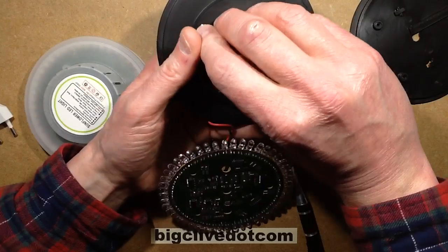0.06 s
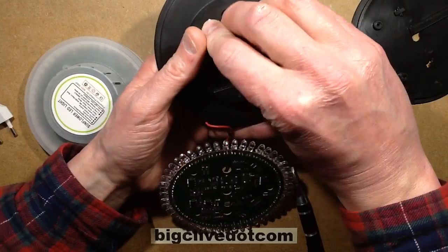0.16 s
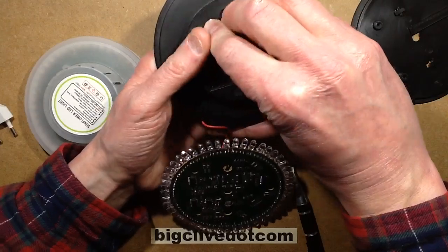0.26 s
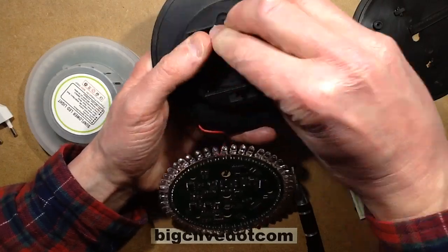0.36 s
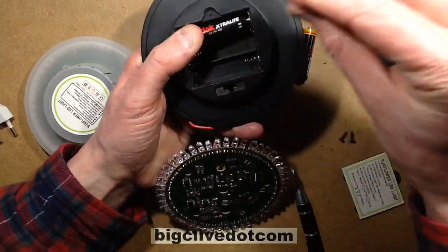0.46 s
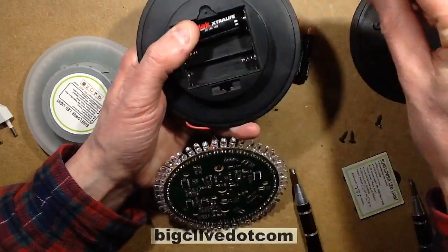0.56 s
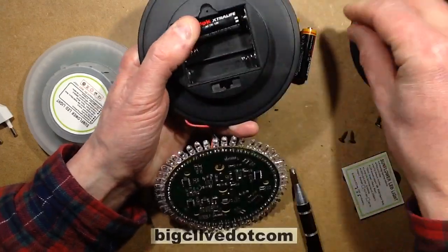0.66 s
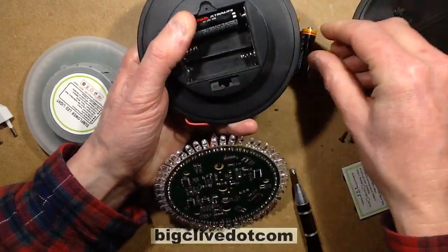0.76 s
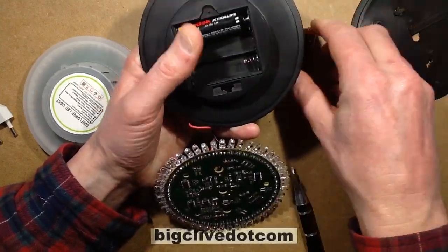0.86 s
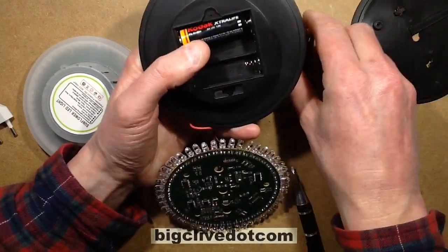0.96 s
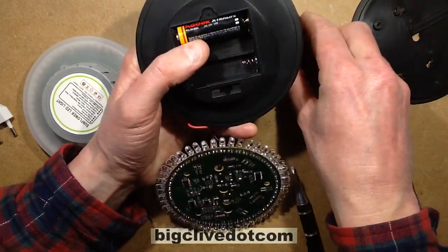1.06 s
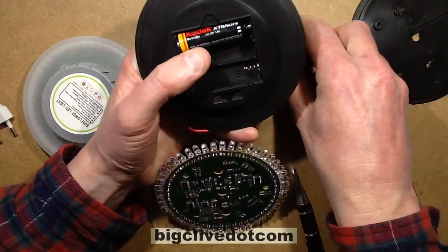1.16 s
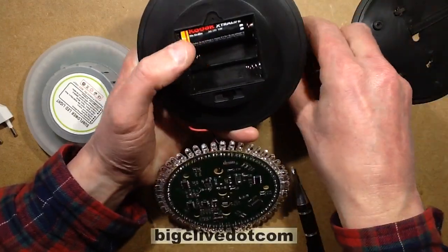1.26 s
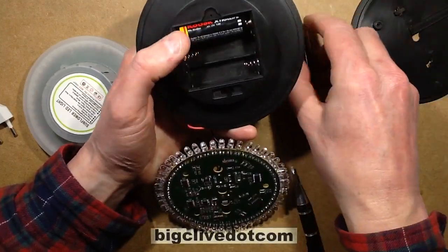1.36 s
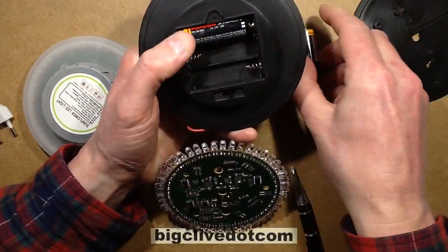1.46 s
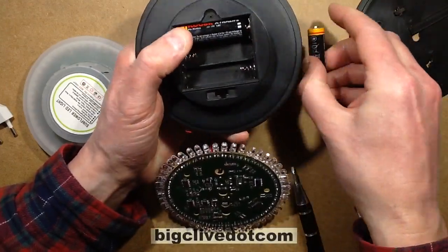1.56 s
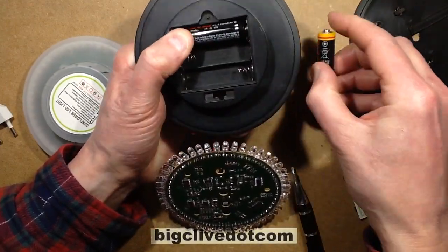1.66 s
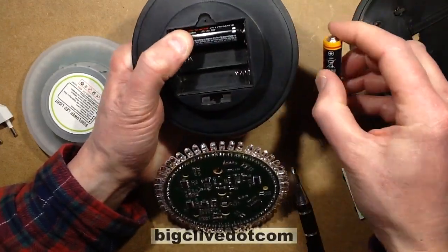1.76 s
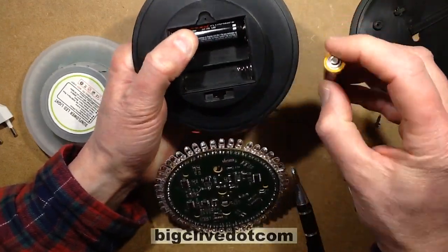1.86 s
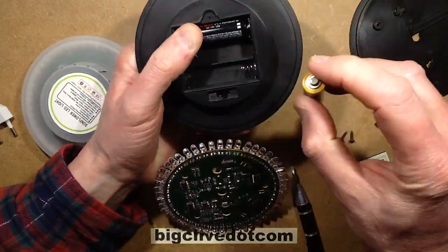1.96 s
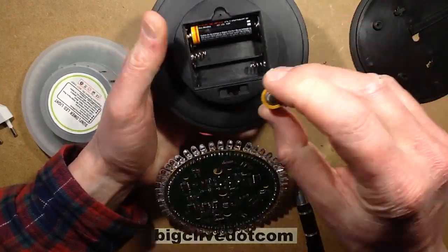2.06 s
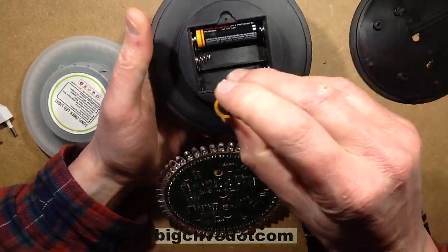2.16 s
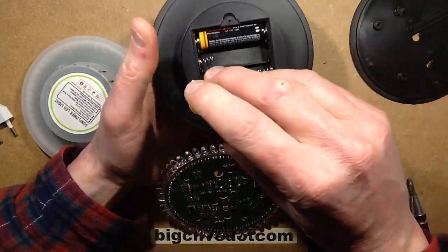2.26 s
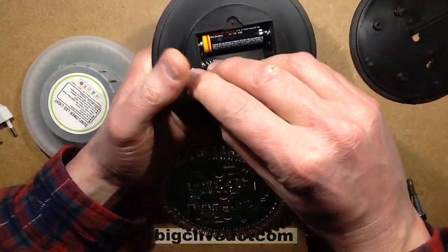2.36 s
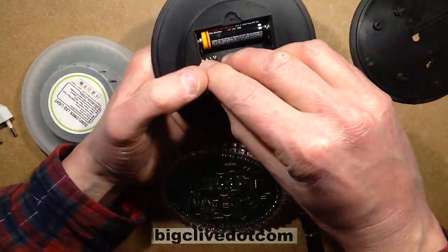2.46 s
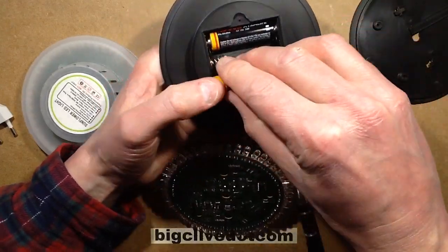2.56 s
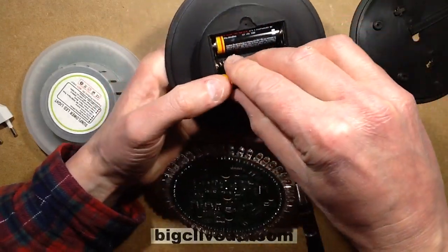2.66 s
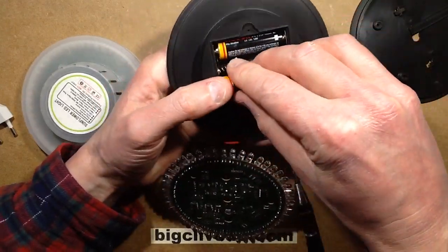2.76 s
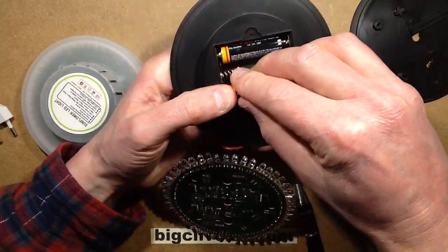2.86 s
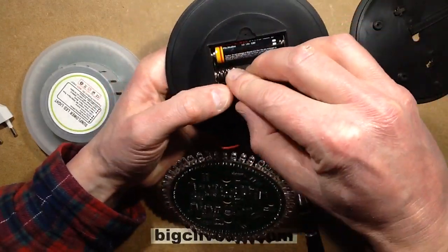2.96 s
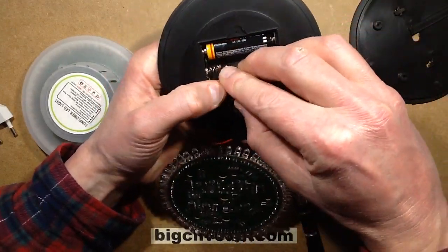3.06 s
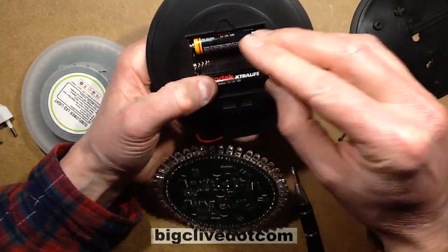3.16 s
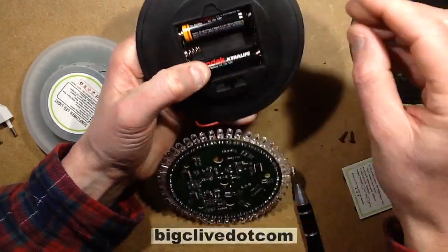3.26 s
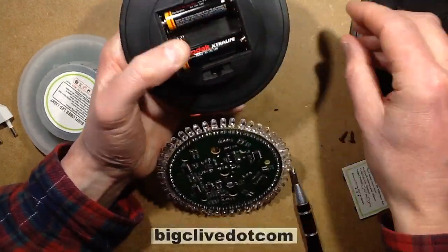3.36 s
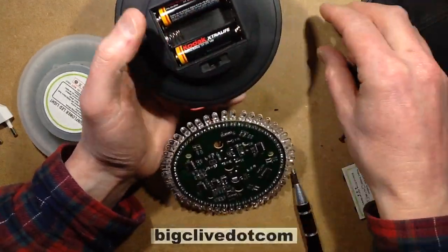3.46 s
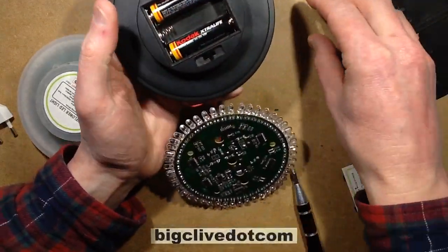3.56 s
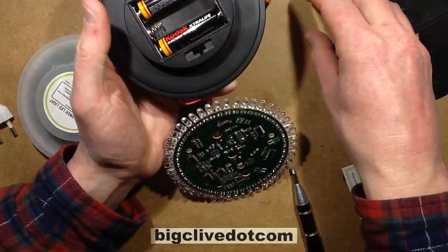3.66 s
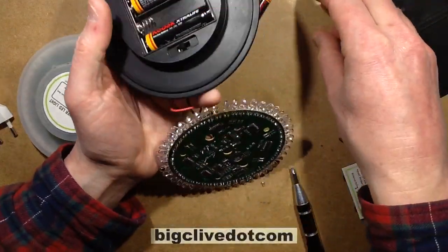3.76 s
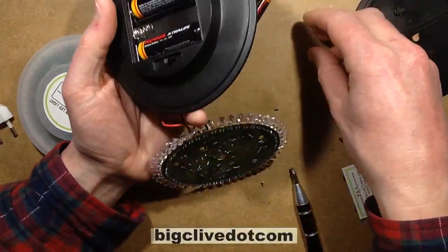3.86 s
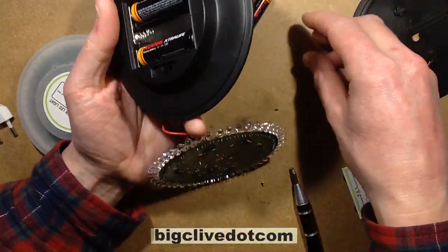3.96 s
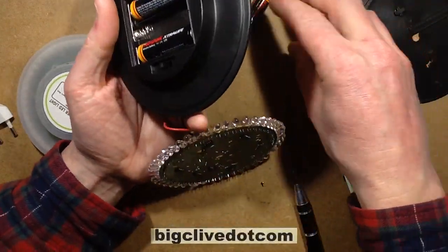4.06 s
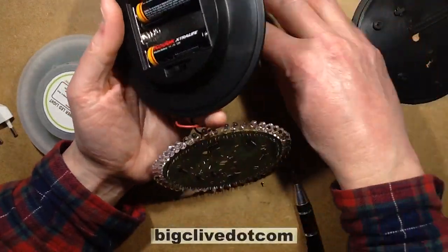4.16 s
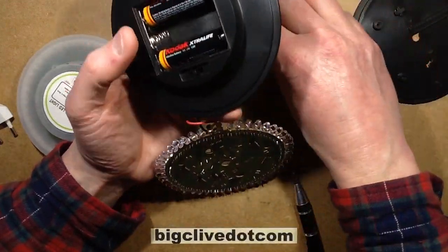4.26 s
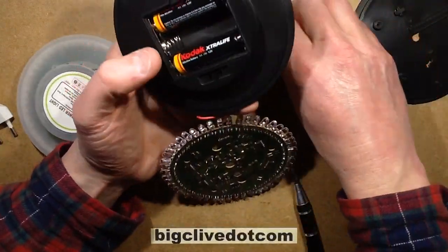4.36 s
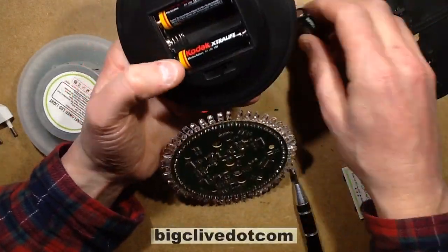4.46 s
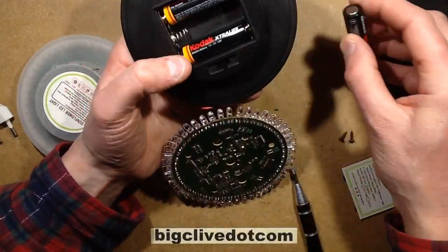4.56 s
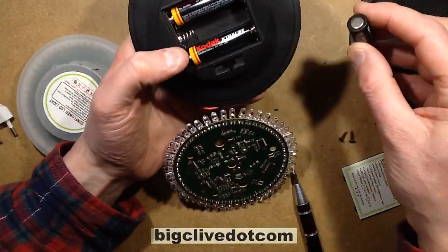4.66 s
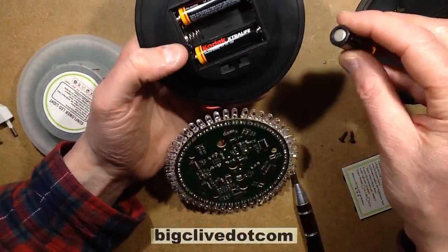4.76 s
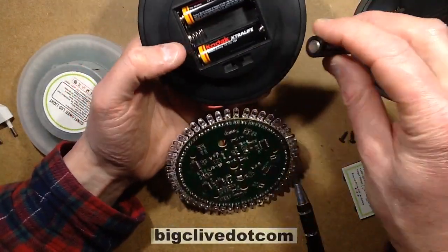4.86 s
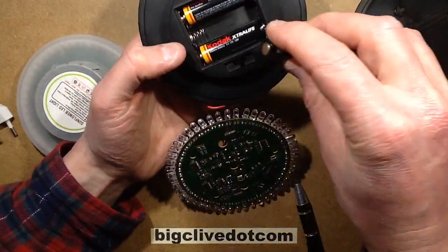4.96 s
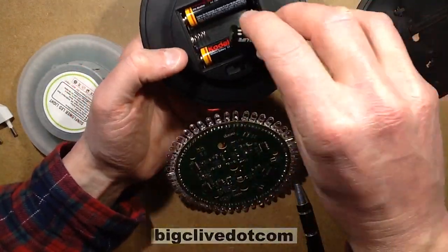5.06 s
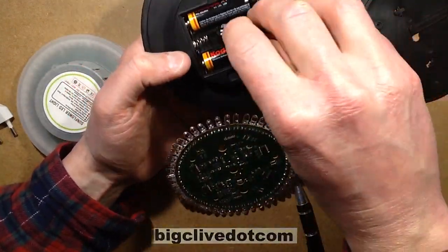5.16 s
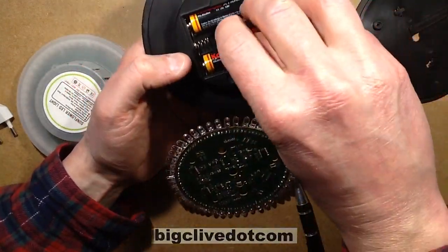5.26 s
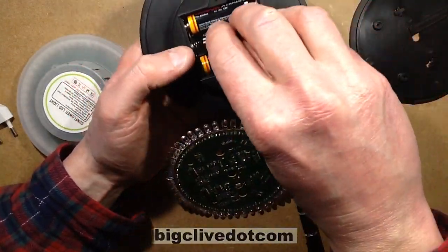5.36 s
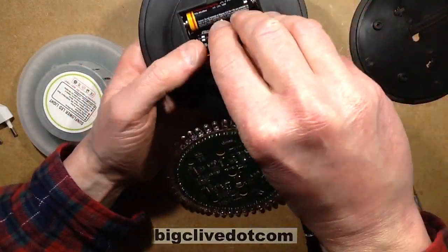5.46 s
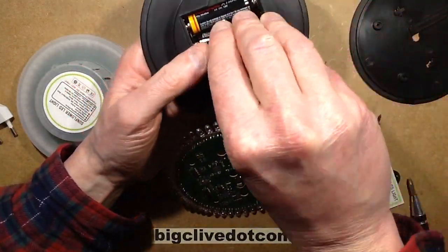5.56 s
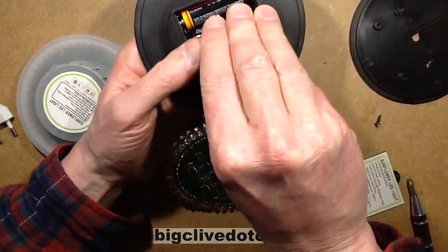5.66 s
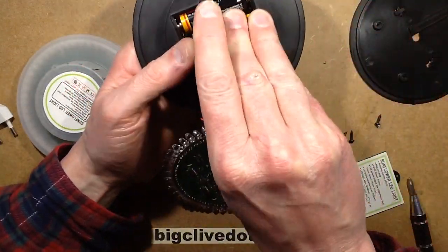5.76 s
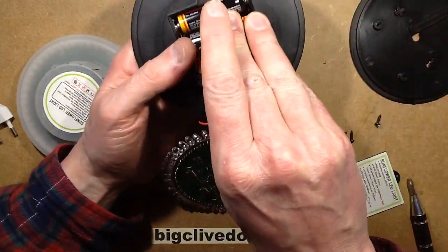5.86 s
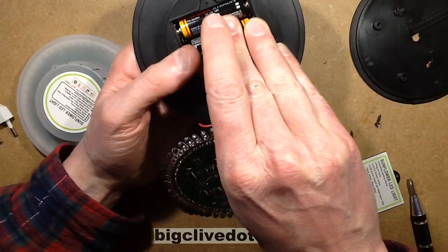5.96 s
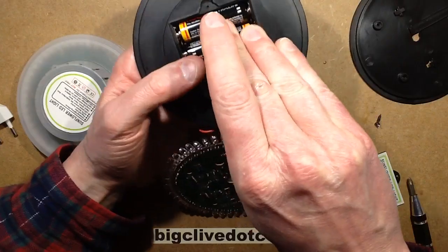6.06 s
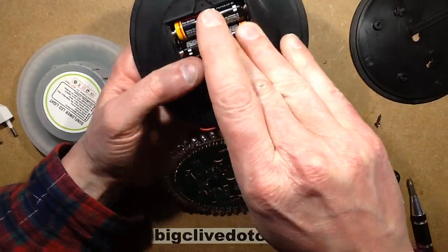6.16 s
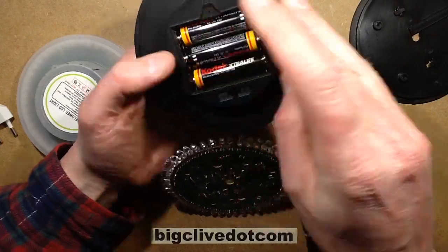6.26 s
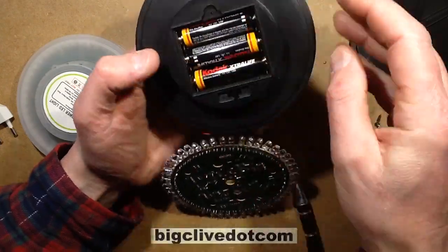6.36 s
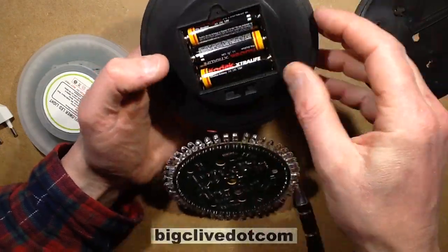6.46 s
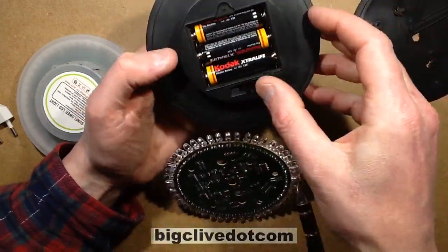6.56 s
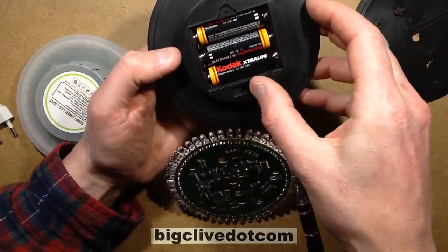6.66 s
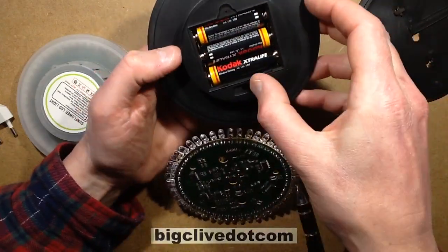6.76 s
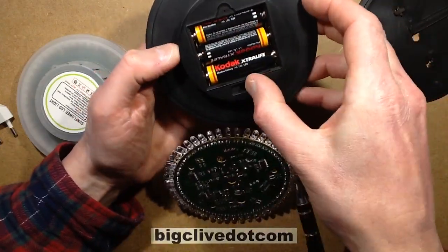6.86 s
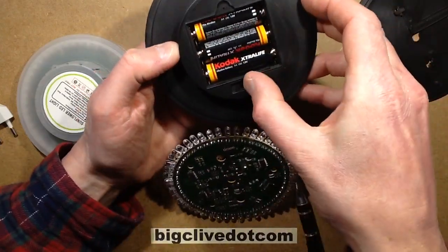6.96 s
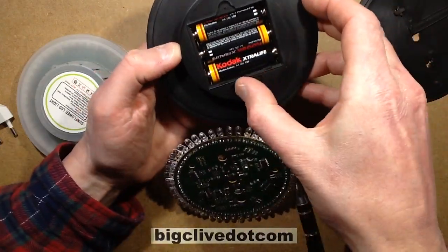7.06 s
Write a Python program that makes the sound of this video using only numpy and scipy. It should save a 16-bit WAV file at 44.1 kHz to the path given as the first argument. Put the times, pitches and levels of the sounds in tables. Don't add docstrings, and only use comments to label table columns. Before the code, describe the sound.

Small batteries snap into a hollow plastic holder with irregular clicks, metal spring pings, finger rubs and soft bench bumps, close up in a small room.

```python
import sys
import numpy as np
from scipy import signal
from scipy.fft import rfft, irfft, next_fast_len
from scipy.io import wavfile
from scipy.ndimage import map_coordinates

SR = 44100
rng = np.random.default_rng(int(sys.argv[2]) if len(sys.argv) > 2 else 0)


def bounce(signal):
    frames = np.transpose(np.atleast_2d(signal))
    limited = np.clip(frames, -1, 1)
    pcm = np.round(limited * 32767).astype(np.int16)
    wavfile.write(sys.argv[1], SR, pcm)


def gain_from_decibels(decibels):
    exponent = np.asarray(decibels, float) / 20
    return 10 ** exponent


N = 313196

# pitch in Hz, width in Hz, level in dB.
BAY_MODES = [(665, 100, 0), (940, 150, -4), (1150, 120, -2)]
# pitch in Hz, width in Hz, level in dB.
SHELL_MODES = [(1430, 230, -9.5), (2053, 210, 1), (2470, 1400, -8.5), (3000, 1100, -6)]
# pitch in Hz, width in Hz, level in dB.
RIM_MODES = [(4060, 570, 0.5), (4900, 1400, -3.5), (5800, 200, -3.5), (6310, 310, -2), (8300, 4700, -7),
             (11080, 2600, -6), (13800, 2700, -12.5)]
# pitch in Hz, width in Hz, level in dB.
BENCH_MODES = [(120, 50, -13), (177, 20, 0), (250, 30, -7), (320, 60, -12), (450, 60, -12)]
# start in seconds, peak in dB, shell ring in Hz,
# bay knock in dB, rim snap in dB (both against the shell ring).
SNAPS = [(0.2202, -24, 1203, -3, -5.5), (0.2375, -20.5, 2230, -17, -38), (1.063, -16, 3620, -29, -9),
         (1.3805, -17, 2050, -10.5, -17), (1.6466, -15, 1900, -4, -10), (2.3329, -11.5, 2440, -9.5, -16.5),
         (2.359, -15, 2044, -6.5, -11.5), (2.7157, -5, 2155, -14.5, -23), (2.7582, -25.5, 2599, -4.5, -9),
         (2.7646, -29, 2580, 2, -12), (2.789, -9, 2120, -13, -21), (2.9012, -25, 2120, -7, -22.5),
         (3.045, -26, 2895, -7, 9), (3.0476, -3, 2580, -11.5, -6.5), (4.209, -25.5, 1580, -3, -39),
         (5.1824, -22.5, 2300, -16, -11), (5.188, -14, 3020, -17, -22.5), (5.445, -31, 2060, -12.5, -8.5),
         (5.697, -18.5, 2600, -7.5, 4.5), (5.7, -15, 2240, -6, -1.5), (5.7163, -23.5, 2542, -39, 2.5),
         (5.968, -13.5, 2700, -15, -4.5), (5.9708, -20.5, 3440, 1.5, 3), (5.9707, -6, 2470, -29, -6.5)]
# start in seconds, peak in dB, bay knock in dB, rim snap in dB.
TAPS = [(.0014, -34, 2, -7), (.0852, -35, 7, -6.5), (.1186, -44, -10, -19), (.5871, -43, -0.5, -4.5),
        (.7699, -36.5, -7.5, -11), (1.644, -30, -30, -7.5), (2.2726, -34.5, 2, -11), (2.2894, -40, -3, -7),
        (2.3244, -30, -0.5, -2.5), (2.4049, -33.5, -14, -17), (2.4534, -38.5, -8.5, -3.5),
        (2.4618, -33, -7, -2), (2.4942, -39.5, -13, -10.5), (2.7116, -36, -13, -7),
        (2.7364, -28.5, -14, -13), (2.8654, -44.5, 0.5, 2), (2.9569, -41.5, -27, -3),
        (3.0334, -44, 2.5, -1), (4.2704, -44.5, -14.5, 6.5), (5.2214, -40, -6.5, -17),
        (5.2904, -43.5, -18, 3.5), (5.3014, -52.5, 1, -2), (5.3193, -36.5, 0.5, -5.5),
        (5.3692, -38, -.5, -22), (5.6864, -36.5, -15, 1), (5.8007, -42, -25, -4), (6.2278, -46.5, -34, -7),
        (6.4737, -53, 2, -4), (6.4921, -41.5, -24, -7), (6.6583, -50.5, -26, -1.5)]
# start in seconds, peak in dB.
TICKS = [(0.0825, -42), (2.8978, -40.5), (2.985, -54), (.2913, -44), (.7319, -46.5), (.7514, -44.5),
         (.825, -47), (1.0634, -29.5), (1.271, -55.5), (1.3765, -41.5), (1.8874, -50), (2.0537, -58),
         (2.3901, -45), (3.0215, -41.5), (3.3369, -48), (3.6522, -55), (3.911, -50.5), (3.9469, -51.5),
         (4.1691, -50.5), (5.2804, -46), (5.914, -53.5), (6.0529, -53.5), (6.2841, -55)]
# start in seconds, thud in dB, bay knock in dB over the thud.
BUMPS = [(.4714, -51.5, 0.5), (1.1824, -59.5, 8), (1.2941, -51, -2.5), (1.6463, -32.5, 2),
         (1.7556, -42, -34), (1.8512, -40.5, -2.5), (3.2765, -58.5, 12.5), (3.7785, -41.5, -14.5),
         (4.1899, -37, -8), (4.2092, -24, -30), (4.2494, -33, -4.5), (6.5474, -70.5, 16.5),
         (6.6124, -77, 19.5), (4.365, -52.5, -4)]
# start in seconds, main pitch in Hz, ring in dB, hum in dB.
PLUCKS = [
    (0.001, 2879, -57.5, -75),
    (0.086, 2879, -62, -76),
    (1.063, 2814, -56, -78),
    (1.381, 2816, -63, -75),
    (2.359, 2814, -63, -77),
    (2.789, 2937, -50, -74),
    (3.049, 2814, -39.5, -68.5),
]
# share of the main pitch, level in dB, time to fall 60 dB in seconds.
SPRING_RING = [(.675, -22, .5), (.893, -14, .2), (1, 0, .3), (1.046, -11, .21), (1.5, -20, .3),
               (1.81, -20, .28)]
# pitch in Hz, level in dB, time to fall 60 dB in seconds.
SPRING_HUM = [(342, -4, 4.5), (1518, 0, 2.6)]
# start in seconds, length in seconds, level in dB,
# centre pitch in Hz, bay creak in dB.
STROKES = [(0, 0.032, -45, 1600, -11), (.213, 0.024, -44.5, 2400, -35), (.24, 0.1, -67, 2530, -18),
           (.352, .035, -56, 2400, -7.5), (.474, 0.042, -61.5, 2330, -10), (.725, .049, -58.5, 1890, -14),
           (.772, 0.06, -55.5, 2200, -15), (.962, 0.17, -68, 1455, -1), (1.554, 0.052, -55.5, 1985, -2.5),
           (2.273, 0.026, -51.5, 1962, -12), (2.365, 0.12, -52.5, 2330, -10), (2.444, .076, -56, 2314, -17),
           (2.62, 0.085, -63.5, 2409, -15.5), (2.722, 0.074, -51, 2356, -10),
           (2.802, 0.14, -53, 2487, -6.5), (2.994, .056, -57, 2280, -11), (3.276, 0.067, -58.5, 3000, -9),
           (4.178, 0.13, -53, 1235, -1), (5.27, 0.077, -43, 2840, -8.5), (5.353, 0.033, -49, 2420, -31),
           (5.716, 0.03, -46.5, 3600, -13), (5.91, 0.07, -67, 2440, -23), (6.488, 0.04, -58, 2286, -14),
           (6.285, 0.011, -59, 2720, -23.5)]
# start in seconds, length in seconds, level in dB, airy fizz in dB.
SLIDES = [(1.445, 0.17, -72.5, -9), (1.582, .028, -68, 18), (1.869, 0.14, -73.5, 2.5),
          (2.935, 0.045, -55, -2), (3.65, 0.2, -69, 2), (3.945, .042, -68, -3), (4.30, 0.063, -65, 1),
          (5.43, 0.067, -55.5, -1), (5.674, 0.0252, -52.5, -1.5), (5.78, 0.072, -64, 2),
          (6.123, 0.047, -71, -11.5), (6.232, 0.032, -67, 10), (6.655, 0.017, -60.5, -9),
          (7.001, 0.1, -61.5, 0.5)]
# frequency in Hz, level in dB per Hz.
SKIN_FIZZ = [(1500, -32.5), (3000, -6), (5000, 4.5), (9000, -3.5), (14000, -6), (16000, -18)]
# loudest moment in seconds, length in seconds,
# bench rumble in dB, casing creak in dB.
SHIFTS = [(0.001, 0.037, -50, -69), (0.106, .08, -68.5, -65), (.25, 0.29, -75, -60),
          (0.485, 0.086, -59.5, -53), (0.78, .2, -66.5, -75), (1.036, 0.25, -51, -52),
          (1.153, 0.23, -52, -57), (1.37, 0.59, -58, -77), (1.665, 0.21, -54, -71),
          (1.776, 0.077, -54, -65), (1.864, 0.082, -54.5, -51), (2.324, 0.26, -67.5, -74),
          (2.473, 0.14, -69, -71), (2.758, 0.21, -54, -67.5), (2.9, 0.23, -68, -55), (3.053, .08, -50, -72),
          (3.31, 0.33, -60, -85), (3.562, 0.43, -70.5, -84), (3.938, 0.14, -66.5, -86),
          (4.37, .1, -55.5, -75), (3.777, 0.35, -59, -65), (4.072, .2, -56, -77), (4.238, 0.24, -41, -71),
          (4.63, 0.4, -68.5, -79), (5.184, .3, -64.5, -71), (5.33, .2, -66, -74), (5.72, 0.18, -56, -81),
          (5.989, 0.12, -61, -67)]
# frequency in Hz, time to fall 60 dB in seconds.
ROOM_DECAY = [(200, 0.07), (1000, 0.17), (3000, .165), (6000, 0.19), (12000, .11)]
# frequency in Hz, level in dB.
ROOM_COLOUR = [(200, 0.5), (800, -1), (1500, 0), (2400, -4), (3800, 0.5), (8000, 1)]
# frequency in Hz, level in dB per Hz.
HISS = [(15, -74), (25, -33), (55, -33.5), (87, -8.5), (134, -16.5), (170, -1.5), (212, -12), (249, -7.5),
        (2160, -11), (2990, -11), (13200, -13), (14800, -12.5), (16000, -17)]
# frequency in Hz, level in dB.
MIC_TOP = [(15000, 1), (15500, -13.5), (16400, -22.5), (16700, -61)]

THIRD_CELL_S = 5.1
SNAP_THUD_DB, TAP_THUD_DB = -40, -25
TAP_RING_HZ, TAP_RING_SPREAD = 2150, .05
TICK_KNOCK_DB, TICK_RIM_DB, TICK_THUD_DB = -8.5, -2, -19.5
BUMP_SHELL_DB, BUMP_RIM_DB = -9, -8
STROKE_FIZZ_DB, SLIDE_HZ, SLIDE_CREAK_DB = -6, 3290, -22
SHIFT_RISE, SHIFT_FADE_DB = 0.56, 18.5
REST_RUMBLE_DB, REST_CREAK_DB = -81, -83.5
HISS_DB, ROOM_DB = -67.5, -18.5


def along(points, hz):
    f, v = np.transpose(points)
    return np.interp(np.log(hz + 1), np.log(f + 1), v)


def unit(x):
    return x / np.sqrt(np.mean(x ** 2) + 1e-20)


def peak(x):
    return x / np.abs(x).max()


def filtered(x, response):
    m = next_fast_len(x.shape[-1] + 8192)
    spectrum = rfft(x, m) * response(np.fft.rfftfreq(m, 1 / SR))
    return irfft(spectrum, m)[..., :x.shape[-1]]


def body(modes):
    def response(f):
        total = 0
        for k, (hz, width, db) in enumerate(modes):
            ring = 1j * f * width / (hz * hz - f * f + 1j * f * width)
            total = total + (-1) ** k * gain_from_decibels(db) * ring
        return total
    return response


def dull(modes, top_hz):
    return lambda f: body(modes)(f) / (1 + 1j * f / top_hz) ** 2


def chatter(t, t60, rattle):
    force = rattle * rng.standard_normal(len(t)) ** 3 * gain_from_decibels(-60 * t / t60)
    force[0] = 1
    return force


def contacts():
    def ring_hz():
        return TAP_RING_HZ * np.exp(TAP_RING_SPREAD * rng.standard_normal())

    rows = [(*row, SNAP_THUD_DB) for row in SNAPS]
    for s, db, knock_db, rim_db in TAPS:
        rows.append((s, db, ring_hz(), knock_db, rim_db, TAP_THUD_DB))
    for s, db in TICKS:
        rows.append((s, db, ring_hz(), TICK_KNOCK_DB, TICK_RIM_DB, TICK_THUD_DB))
    for s, thud_db, knock_db in BUMPS:
        shell_db = thud_db + knock_db + BUMP_SHELL_DB
        rows.append((s, shell_db, ring_hz(), -BUMP_SHELL_DB, BUMP_RIM_DB, thud_db - shell_db))
    return rows


def hits():
    out, t = np.zeros(N + SR), np.arange(SR // 12) / SR
    for s, db, ring_hz, knock_db, rim_db, thud_db in contacts():
        force = chatter(t, t60=.03, rattle=.014)
        grip = rng.normal(0, 2.2, 4)
        shell = [(hz, width, level + change - 5) for (hz, width, level), change in zip(SHELL_MODES, grip)
                 if abs(hz - ring_hz) > 150]
        shell.append((ring_hz, 330 * (ring_hz / 2200) ** 2, 1))
        muffle_db = 6 * (s > THIRD_CELL_S)
        bay = [(340.2, 650, -14.5)]
        for (hz, width, level), change in zip(BAY_MODES, grip):
            bay.append((hz, width, level + change - muffle_db * (hz > 800)))
        sound = peak(filtered(force, dull(sorted(shell), top_hz=4000)))
        sound += gain_from_decibels(knock_db) * peak(filtered(force, dull(bay, top_hz=1940)))
        sound += gain_from_decibels(rim_db) * peak(filtered(chatter(t, t60=0.021, rattle=0.13), body(RIM_MODES)))
        sound += gain_from_decibels(thud_db) * peak(filtered(force, dull(BENCH_MODES, top_hz=500)))
        out[round(s * SR):][:len(t)] += gain_from_decibels(db) * sound
    return out[:N]


def springs():
    out = np.zeros(N)
    stops = [row[0] for row in PLUCKS[1:]] + [N / SR]
    for (s, main_hz, ring_db, hum_db), stop in zip(PLUCKS, stops):
        first, last = round(s * SR), round(stop * SR)
        t = np.arange(last - first) / SR
        modes = [(share * main_hz, ring_db + db, t60) for share, db, t60 in SPRING_RING]
        modes += [(hz, hum_db + db, t60) for hz, db, t60 in SPRING_HUM]
        out[first:last] = sum(gain_from_decibels(db - 60 * t / t60) * np.sin(2 * np.pi * hz * t) for hz, db, t60 in modes)
    return out


def slips(size, rate, spread_db):
    fires = rng.random(size) < rate / SR
    grains = fires * rng.standard_normal(size) * gain_from_decibels(spread_db * rng.exponential(1, size))
    return unit(unit(grains) + 1.3 * rng.standard_normal(size))


def wobble(rate):
    knots = rng.standard_normal(int(N * rate / SR) + 4)
    return map_coordinates(knots, [np.arange(N) * rate / SR])


def strokes():
    rows = [(*row, STROKE_FIZZ_DB) for row in STROKES]
    for s, length, db, fizz_db in SLIDES:
        rows.append((s, length, db, SLIDE_HZ, SLIDE_CREAK_DB, fizz_db))
    return rows


def rubs():
    out, t = np.zeros(N + SR), np.arange(SR // 5) / SR
    clumps = gain_from_decibels(2.8 * wobble(110))
    for start, length, db, centre_hz, creak_db, fizz_db in strokes():
        swell = t / (.003 + .12 * length)
        lift_off = (length - t) / .05 + .45
        stroke = np.clip(np.minimum(swell, lift_off), 0, 1) * gain_from_decibels(-6 * t / length)
        force = slips(len(t), rate=1500, spread_db=1.5)

        def casing(f):
            rubbed_spot = body([(centre_hz, .5 * centre_hz, 0)])(f) ** 2
            return rubbed_spot * (1 + 0.5 * np.abs(body(SHELL_MODES)(f)))

        sound = unit(filtered(force, casing))
        sound += gain_from_decibels(creak_db) * unit(filtered(force, dull(BAY_MODES[:1], top_hz=895)))
        sound += gain_from_decibels(fizz_db) * unit(filtered(force, lambda f: gain_from_decibels(along(SKIN_FIZZ, f))))
        out[round(start * SR):][:len(t)] += gain_from_decibels(db) * stroke * sound
    return out[:N] * clumps


def hands():
    t = np.arange(N) / SR - .012
    creak_db = np.full(N, REST_CREAK_DB, float)
    rumble_db = np.full(N, REST_RUMBLE_DB, float)
    for s, length, bench_db, casing_db in SHIFTS:
        before, after = (s - t) / SHIFT_RISE, (t - s) / (1 - SHIFT_RISE)
        away_db = SHIFT_FADE_DB * np.maximum(before, after) / length
        creak_db = np.maximum(creak_db, casing_db - away_db)
        rumble_db = np.maximum(rumble_db, bench_db - away_db)
    creak = unit(filtered(slips(N, rate=2600, spread_db=2.5), body(BAY_MODES)))
    rumble = unit(filtered(slips(N, rate=180, spread_db=-3.5), dull(BENCH_MODES, top_hz=730)))
    return gain_from_decibels(creak_db - 12.5) * creak + gain_from_decibels(rumble_db - 0.5) * rumble


def room(x, step=SR // 4):
    out = np.zeros(N + SR)
    for i in range(0, N, step):
        hz, t, z = signal.stft(rng.standard_normal(SR // 3), SR, nperseg=256)
        fade = gain_from_decibels(-60 * t / along(ROOM_DECAY, hz)[:, None])
        tail = signal.istft(z * fade, SR, nperseg=256)[1]
        delayed = np.pad(tail / np.linalg.norm(tail), (250, 0))
        wet = signal.fftconvolve(x[i:i + step], delayed)
        out[i:i + len(wet)] += wet
    return out[:N]


def background_hiss():
    return unit(filtered(rng.standard_normal(N), lambda f: gain_from_decibels(along(HISS, f))))


def scene():
    def airborne(f):
        return (1j * f / (110 + 1j * f)) ** 3

    near = filtered(hits() + rubs() + hands(), airborne)
    echo = room(filtered(near, lambda f: gain_from_decibels(along(ROOM_COLOUR, f))))
    mix = near + springs() + gain_from_decibels(ROOM_DB) * echo + gain_from_decibels(HISS_DB) * background_hiss()
    return mix[None]


def roll_off(x):
    return signal.sosfilt(signal.butter(12, 16470, fs=SR, output="sos"), x)


def record(dry):
    over = np.maximum(np.abs(dry[0]) - .15, 0)
    keep = np.exp(-1 / (1.1 * SR))
    load = signal.lfilter([.3], [1, -keep], over)
    duck_db = signal.lfilter([.001], [1, .001 - 1], 9 * np.tanh(load / 9))
    heard = filtered(dry * gain_from_decibels(-duck_db), lambda f: gain_from_decibels(along(MIC_TOP, f)))
    return roll_off(heard)


dry = scene()
out = record(dry)
bounce(out)
```